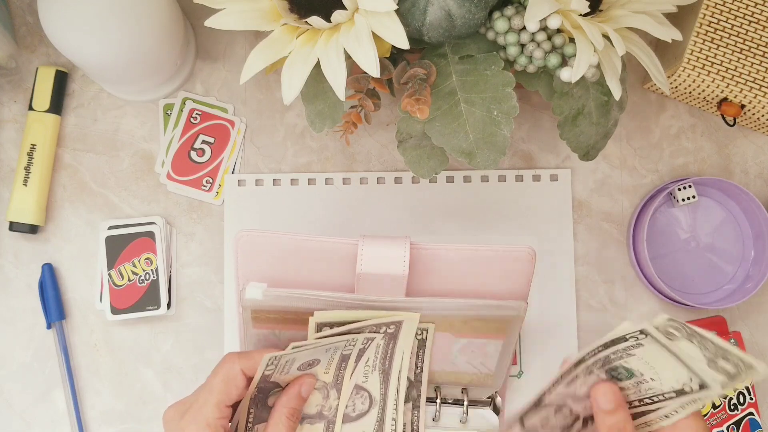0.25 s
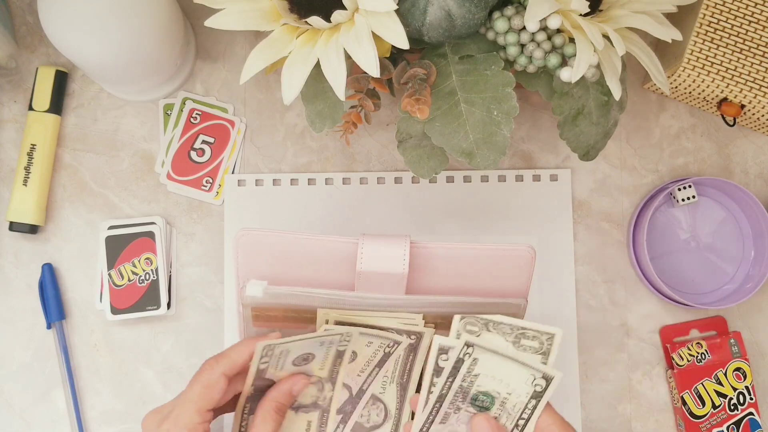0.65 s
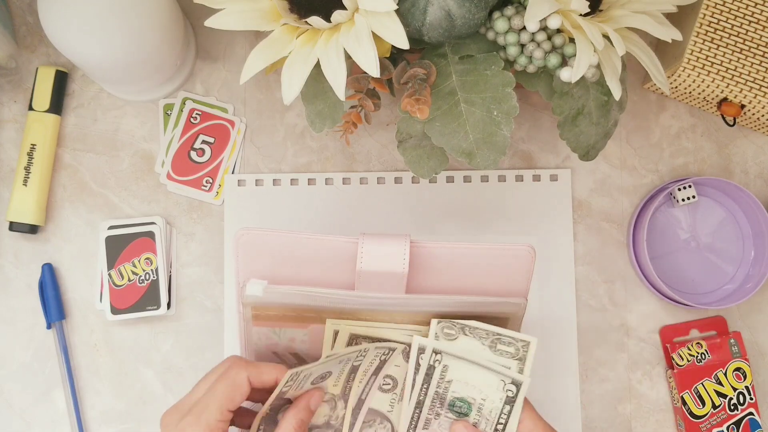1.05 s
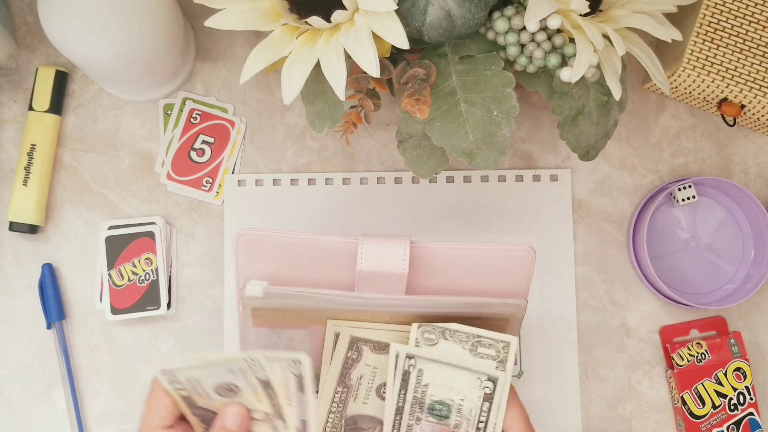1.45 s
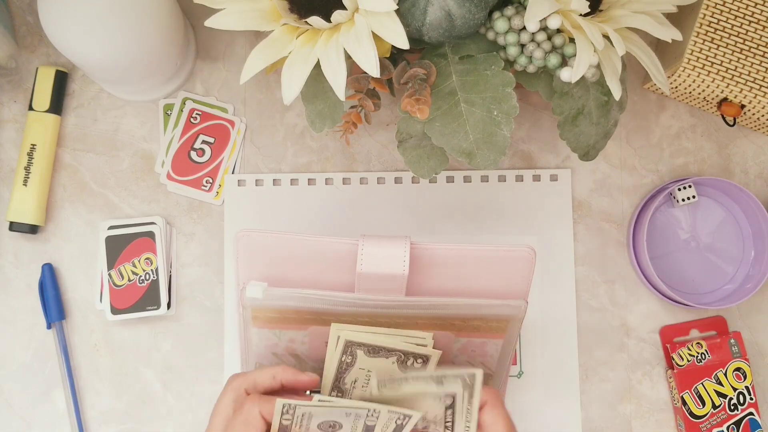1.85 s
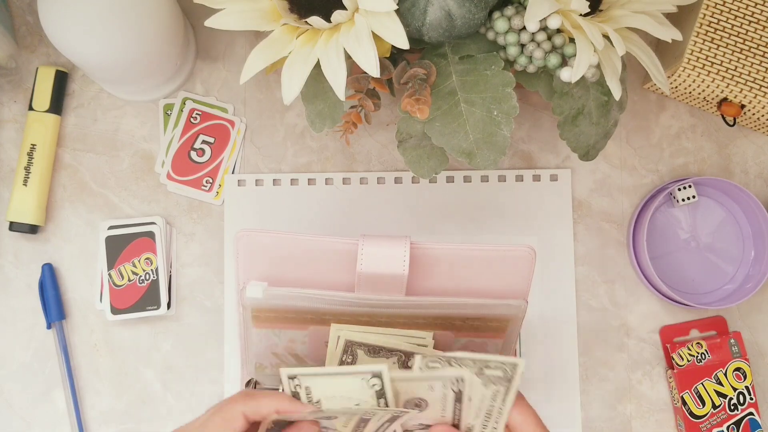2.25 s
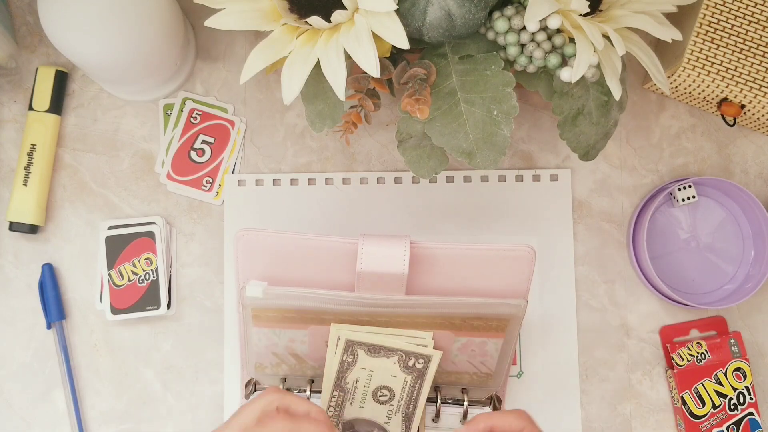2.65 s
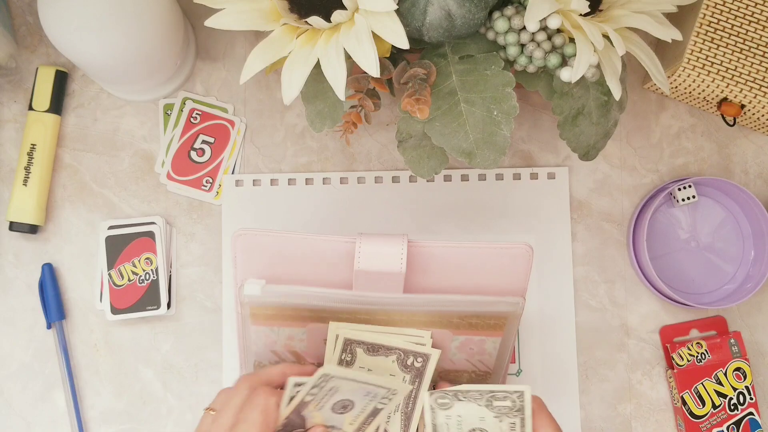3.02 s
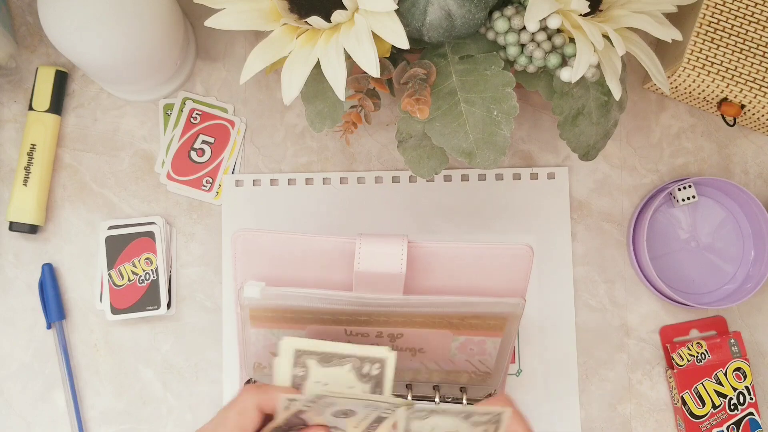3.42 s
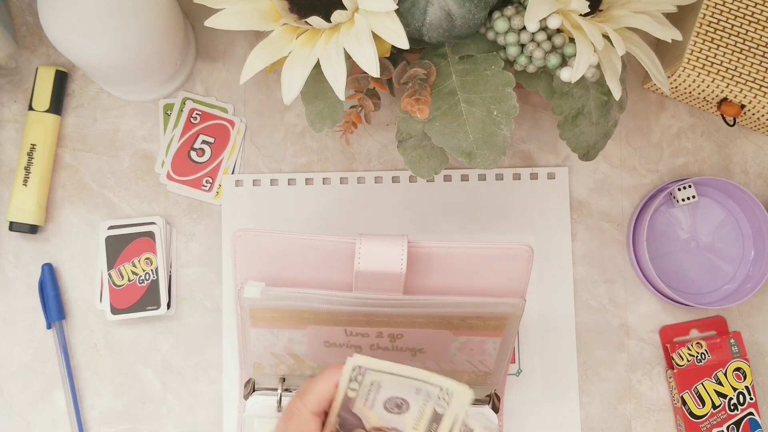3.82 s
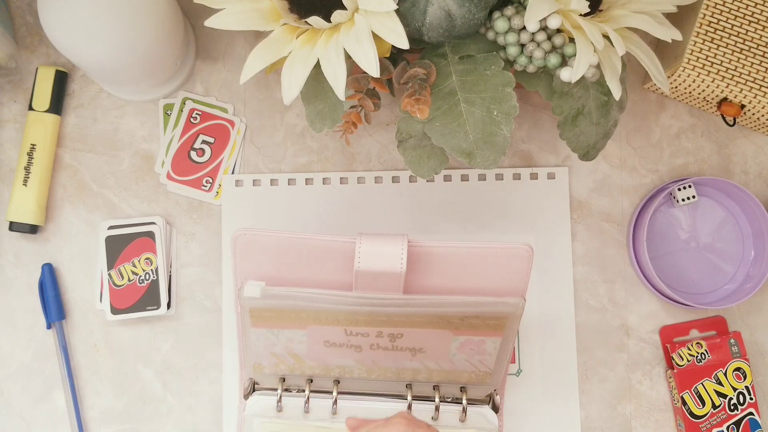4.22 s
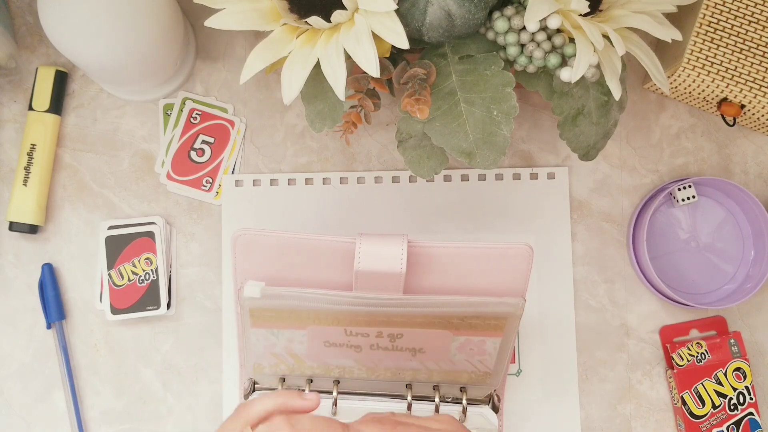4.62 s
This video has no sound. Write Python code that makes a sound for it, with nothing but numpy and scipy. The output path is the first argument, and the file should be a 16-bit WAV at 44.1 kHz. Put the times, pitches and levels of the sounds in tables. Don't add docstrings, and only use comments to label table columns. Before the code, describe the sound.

Close to the microphone, hands sort worn paper bills at a table in a small quiet room. A quick rustle opens, then soft thin sliding; after two seconds the handling grows busy with flexing, crisp snaps and flicks, peaking in a sharp snap near the end before fading. A steady low motor hum slowly pulses underneath.

```python
import sys
import numpy as np
from scipy import signal
from scipy.fft import rfft, irfft, next_fast_len
from scipy.io import wavfile
from scipy.ndimage import uniform_filter1d

SR = 44100
rng = np.random.default_rng(int(sys.argv[2]) if len(sys.argv) > 2 else 0)


def boost(x):
    u = np.asarray(x, float) / 20
    return 10 ** u


def materialize(psi):
    bounded = np.clip(np.atleast_2d(psi).T, -1, 1)
    quanta = np.round(bounded * 32767).astype(np.int16)
    wavfile.write(sys.argv[1], SR, quanta)


N = 210435


def rms_one(x):
    return x / np.sqrt(np.mean(x ** 2) + 1e-20)


def at_hz(points, hz):
    points = np.array(points)
    return np.interp(np.log(hz + 1), np.log(points[:, 0]), points[:, 1], left=-130, right=-130)


def coloured(x, spectrum):
    size = next_fast_len(len(x))
    gain = boost(at_hz(spectrum, np.fft.rfftfreq(size, 1 / SR)))
    return irfft(rfft(x, size) * gain, size)[:len(x)]


def drift(rate_hz):
    r = np.exp(-2 * np.pi * rate_hz / SR)
    slow = rng.standard_normal(N + SR)
    for _ in range(2):
        slow = signal.lfilter([1 - r], [1, -r], slow)
    return rms_one(slow[SR:])


def resonance(x, hz, width_hz):
    r = np.exp(-np.pi * width_hz / SR)
    poles = [1, -2 * r * np.cos(2 * np.pi * hz / SR), r * r]
    return signal.lfilter([(1 - r * r) / 2, 0, (r * r - 1) / 2], poles, x)


def blurred(field, bins, frames):
    return uniform_filter1d(uniform_filter1d(field, size=bins, axis=0), size=frames, axis=1)


def hum():
    # frequency in Hz, peak level in dB.
    tones = [(63.01, -36.3), (59.58, -45.5), (120.045, -50.2), (119.1, -67), (240.09, -71)]
    # frequency in Hz, density in dB per Hz.
    rumble_colour = [(15, -13), (30, -11), (41, -16), (52, 8.5), (75, 1.5), (100, -5), (150, -12.5),
                     (210, -18.5), (320, -21.5), (420, -38.5), (1000, -46.5), (2500, -55), (6000, -42.5),
                     (14000, -48)]
    beat_top_s, rumble_db = 0.237, -47
    t = np.arange(N) / SR - beat_top_s
    out = boost(rumble_db) * rms_one(coloured(rng.standard_normal(N), rumble_colour))
    for hz, db in tones:
        level = boost(db + 0.2 * drift(4.5))
        out += level * np.cos(2 * np.pi * hz * t + 0.04 * drift(0.27))
    return out


def room(x):
    t60_s, gap_s = 0.15, 0.003
    t = np.arange(SR // 2) / SR
    tail = rng.standard_normal(len(t)) * boost(-60 * t / t60_s) * (t > gap_s)
    tail = signal.lfilter([0.5], [1, -0.5], tail)
    return signal.fftconvolve(x, tail / np.sqrt(np.sum(tail ** 2)))[:N]


def thumps():
    # start in seconds, peak level in dB, 60 dB decay in seconds.
    blows = [(0.088, -40, 0.09), (1.582, -47, 0.17), (2.591, -53, 0.15), (2.646, -51.5, 0.085),
             (3.682, -50, 0.17), (3.797, -45, 0.28), (3.866, -48, 0.07), (3.974, -45, 0.23),
             (4.018, -41.5, 0.088), (4.379, -41, 0.088), (4.593, -48, 0.041), (4.614, -47, 0.16)]
    out, t = np.zeros(N + SR), np.arange(SR // 4) / SR
    board = signal.butter(2, [130, 480], "band", fs=SR, output="sos")
    onset = 1 - np.exp(-t / 0.0012)
    for s, peak_db, t60_s in blows:
        noise = rng.standard_normal(len(t))
        puff = signal.sosfilt(board, noise * boost(-60 * t / max(t60_s, 0.01)) * onset)
        at = round(s * SR)
        out[at:at + len(t)] += boost(peak_db) * puff / np.abs(puff).max()
    return out[:N]


def ticks():
    # start in seconds, peak level in dB.
    flicks = [
        (0.39, -46),
        (1.599, -33),
        (1.811, -54),
        (2.705, -42),
        (2.964, -31),
        (3.219, -50),
        (3.473, -43),
        (3.8, -41.5),
        (4.357, -38.5),
        (4.362, -31),
    ]
    decay_s, low_cut_hz = 0.0019, 5000
    out, t = np.zeros(N + SR), np.arange(SR // 40) / SR
    bright = signal.butter(2, low_cut_hz, "high", fs=SR, output="sos")
    for s, peak_db in flicks:
        burst = signal.sosfilt(bright, rng.standard_normal(len(t)) * np.exp(-t / decay_s))
        at = round(s * SR)
        out[at:at + len(t)] += boost(peak_db) * burst / np.abs(burst).max()
    return out[:N]


def snaps():
    # start in seconds, peak level in dB, ringing in Hz, low flexing part in dB.
    creases = [(0.091, -37, 4740, -35), (0.131, -38, 5840, -30), (0.39, -38, 4540, -34),
               (0.434, -37.5, 5640, 7), (1.599, -35, 3800, -30), (1.62, -42, 3980, -3),
               (2.163, -39, 3350, -11), (2.195, -30.5, 3500, -16), (2.367, -28.5, 3200, 12),
               (2.584, -37.5, 5160, -27), (2.644, -28.5, 5440, -12), (2.705, -26.5, 7700, -45),
               (2.716, -32.5, 7200, -23), (2.964, -36.5, 5000, -31), (3.003, -41, 3370, 4),
               (3.019, -38.5, 3880, 20), (3.176, -46, 3880, -8), (3.219, -37, 3180, -5.5),
               (3.407, -45, 5360, -3), (3.473, -35, 4900, -18), (3.8, -33, 3440, -6),
               (3.816, -30.5, 3440, -4), (3.879, -28.5, 3120, -5), (3.97, -32, 3960, -27),
               (3.987, -32, 3160, -25), (4.015, -31.5, 3400, 6), (4.127, -36, 3800, -41),
               (4.137, -31, 2960, -45), (4.361, -31, 4570, -7), (4.3865, -17.5, 3320, -3)]
    rattle_db, rattle_s = -18.5, 0.022
    out, t = np.zeros(N + SR), np.arange(SR // 6) / SR
    bright = signal.butter(2, [2800, 14000], "band", fs=SR, output="sos")
    dull = signal.butter(2, [550, 2200], "band", fs=SR, output="sos")
    pop = (1 - np.exp(-t / 0.0002)) * np.exp(-t / 0.001)
    envelope = pop + boost(rattle_db) * np.exp(-t / rattle_s)
    for s, peak_db, hz, flex_db in creases:
        white = rng.choice([-1, 1], len(t)) * rng.uniform(0.79, 1, len(t))
        burst = white * envelope
        high = signal.sosfilt(bright, burst) + boost(8) * resonance(burst, hz, 0.16 * hz)
        high = signal.lfilter(*signal.butter(2, min(1.75 * hz, 15000), fs=SR), high)
        low = signal.sosfilt(dull, burst) + boost(3) * resonance(burst, 1450, 400)
        both = high / np.abs(high).max() + boost(flex_db) * low / np.abs(low).max()
        at = round(s * SR)
        out[at:at + len(t)] += boost(peak_db + 3) * both / np.abs(both).max()
    return out[:N]


def fibres(per_s, spread_db, clump_db):
    sizes = boost(spread_db * np.minimum(rng.exponential(1, N), 5)) * rng.choice([-1, 1], N)
    chance = rng.random(N) < per_s / SR
    return sizes * chance * boost(clump_db * drift(34))


def bending(x, patchy_db):
    cells = signal.stft(x, nperseg=512)[2]
    patches = blurred(blurred(rng.standard_normal(cells.shape), 4, 8), 4, 8)
    return signal.istft(cells * boost(patchy_db * rms_one(patches)), nperseg=512)[1][:N]


def sheet(x):
    # frequency in Hz, width in Hz, lift in dB.
    modes = [(719, 32, 7.5), (1235, 20, 5.5), (1447, 22, 9), (1603, 14, 9), (1906, 110, 5),
             (3485, 760, 6.5), (5600, 60, 7), (10100, 90, -1)]
    return x + sum((boost(db) - 1) * resonance(x, hz, width_hz) for hz, width_hz, db in modes)


def swell(s, db, rise_s, fade_s):
    rounding = 1.223
    t = np.arange(N * 1000 // SR + 2) / 1000 - s
    away = np.maximum(-t / np.maximum(rise_s, 0.002), t / np.maximum(fade_s, 0.01))
    return db - 20 * away ** rounding


def strokes(rows, rise_s, rise_share, body_db):
    fade_stretch = (0.99, 1, 1, 1.02)
    body_per_weight = 1.58
    s, rub_db, fade_s, weight_db, sheen_db = np.transpose(rows)[:, :, None]
    parts_db = [0, weight_db, sheen_db, body_db + body_per_weight * weight_db]
    powers = []
    for part_db, stretch in zip(parts_db, fade_stretch):
        level_db = swell(s, rub_db + part_db, rise_s + rise_share * fade_s, stretch * fade_s)
        powers.append(np.sum(boost(2 * level_db), axis=0))
    return np.array(powers)


def handling():
    # peak time in seconds,
    # rub in dB, seconds to fade 20 dB, weight in dB, sheen in dB.
    glides = [(0.052, -51, 0.07, -1.5, 4), (0.098, -41.5, 0.0353, -2, -2.5), (0.15, -53, 0.14, -4.5, 2),
              (0.28, -57, 0.23, -10.5, -2.5), (0.545, -53.5, 0.08, -8.5, -7), (0.624, -50, 0.213, -12, 2),
              (0.85, -53, 0.11, -9.5, 1.5), (1.0, -55.5, 0.08, -9.5, -3), (1.055, -59.5, 0.02, -24, 4.5),
              (1.23, -58, 0.2, -9, 1), (1.4, -74.5, 0.1, -2, -2), (1.54, -66, 0.4, -10.5, 0.5),
              (1.877, -57, -0.02, -4, 3), (1.98, -53.5, -0.37, -2.5, 6.5), (2.071, -58, 0.23, -11, -6),
              (2.147, -48, 0.04, -8, -3.5), (2.585, -46.5, 0.23, -4.5, -3.5), (2.865, -60, .08, -18, -5),
              (3.081, -50, 0.04, -3, -8.5), (3.545, -58.5, 0.14, -6, 4), (3.735, -57.5, 0.08, -17, 2.5),
              (4.136, -40.5, 0.0355, -11, -9.5), (4.585, -58, 0.08, -13, -1), (4.77, -60, 0.14, -10, -1)]
    # start in seconds,
    # rub in dB, seconds to fade 20 dB, weight in dB, sheen in dB.
    jolts = [(0.388, -57.5, .3, -1.5, -1), (1.598, -58.5, 0.1, 6.5, 3.5), (1.735, -67.5, 0.9, -2, 1),
             (1.811, -58, 1.4, -6, -0.5), (2.197, -47, -0.01, -1.5, -4), (2.365, -46, 0.12, 0, -3),
             (2.648, -44, 0.18, -6, -8), (2.706, -46.5, 0.1152, -10, -2), (2.963, -59, 0.6, 0.5, -1),
             (3.218, -47.5, 0.0359, 1.5, -2), (3.472, -54, 0.09, -7, 3), (3.874, -50, 0.0947, 3, 1.5),
             (0.94, -62.5, 0.21, -1.5, 2), (4.357, -47, 0.1253, -4.5, 0), (4.389, -37, -0.0057, 3.5, -14)]
    # peak time in seconds,
    # rub in dB, seconds to fade 20 dB, weight in dB, sheen in dB.
    shoves = [(1.115, -61.5, -0.44, -17, 2), (2.232, -51, .12, -1, -0.5), (2.345, -49, 0.1, -7.5, -3),
              (2.435, -52.5, 0.02, -4, 4), (2.53, -52.5, 0.21, -2.5, 0.5), (2.0, -59.5, 1.2, 0, 4.5),
              (3.145, -55.5, 0.31, -4, -2), (3.283, -55, 0.25, -5, -3), (3.33, -56, 0.2, -7.5, -1),
              (3.41, -56.5, 0.15, -7, 0), (3.625, -61, 0, -19, 2), (3.805, -44, 0.1747, -3, -2.5),
              (3.972, -45.5, .15, -3, -0.5), (4.014, -49.5, 0.0538, 5, -2), (4.17, -53.5, 0.14, -8, -1),
              (4.235, -64, 0.1, -8.5, 0), (4.381, -41.5, 0.0343, -4, 0), (4.48, -60.5, 0.26, -9, -1.5),
              (4.53, -60, 0, -11, -3), (4.66, -67, 0, -4, -4)]
    # peak time in seconds,
    # body in dB, seconds to fade 20 dB.
    flops = [(0.11, -60, 0.42), (0.27, -82, 0.6), (0.49, -70.5, 0.6), (0.72, -76, 0.34), (0.8, -71, .12),
             (0.98, -70.5, 0.37), (1.12, -84, 0.3), (1.34, -77.5, 1), (1.615, -58.5, 0.12),
             (1.82, -66, 0.3), (2.07, -74, -0.34), (2.16, -63, 0), (2.25, -67, 0), (2.44, -55, 0.15),
             (2.6, -52.5, 0.27), (2.988, -52.5, 0.09), (3.29, -63.5, 0.4), (3.41, -70, 0.6),
             (3.7, -74, 0.9), (3.813, -41, 0.0453), (3.98, -58.5, 0.12), (4.02, -62.5, 0.32),
             (4.384, -45, 0.0465), (4.6, -72, 0.3)]
    # rub, flex, hiss and body, all in dB.
    resting_db = (-90, -86, -79, -118)
    power = strokes(glides, rise_s=0, rise_share=0.85, body_db=-23)
    power += strokes(jolts, rise_s=0.003, rise_share=0, body_db=-10.5)
    power += strokes(shoves, rise_s=0.022, rise_share=0, body_db=-10.5)
    power += boost(2 * np.array(resting_db))[:, None]
    s, db, fade_s = np.transpose(flops)[:, :, None]
    power[3] += np.sum(boost(2 * swell(s, db, 0.38 * fade_s, fade_s)), axis=0)
    ms = np.arange(N) * 1000 / SR
    return [np.interp(ms, np.arange(len(p)), 10 * np.log10(p)) for p in power]


def slide():
    # frequency in Hz, density in dB per Hz.
    rub_colour = [(2200, -65), (2600, -9), (3400, -9.5), (4500, -5.5), (6000, -6.5), (7200, -20.5),
                  (8500, -39)]
    hiss_colour = [(6000, -12), (7200, -10), (8200, -10), (9500, -8), (11000, -9), (14000, -12.5),
                   (15200, -20)]
    flex_colour = [(850, -16.5), (1100, -26.5), (1260, -4), (1450, -4.5), (1900, -7), (2250, -7),
                   (2600, -11.5)]
    body_colour = [(330, -68), (450, -2.5), (560, 2), (740, 3), (900, 0), (1100, 7.5), (1350, -20.5)]
    rub_db, flex_db, hiss_db, body_db = handling()
    grains = fibres(per_s=7000, spread_db=0.0, clump_db=0.5)
    catch = sheet(bending(grains, patchy_db=2.5))
    rub = boost(rub_db + 0.18 * drift(56)) * rms_one(coloured(catch, rub_colour))
    hiss = boost(hiss_db + 0.67 * drift(16)) * rms_one(coloured(catch, hiss_colour))
    flex = boost(flex_db + 0.72 * drift(27)) * rms_one(coloured(catch, flex_colour))
    body = boost(body_db + 0.57 * drift(6.7)) * rms_one(coloured(catch, body_colour))
    return rub + hiss + flex + body


def scene():
    room_db = -11.5
    hits = snaps()
    paper = slide() + hits + ticks()
    return (hum() + boost(room_db) * room(hits) + thumps() + paper)[None, :]


def thin_bands(x):
    # frequency in Hz, level in dB per cell.
    thinning_floor = [(300, -125), (450, -106), (900, -105), (2450, -106), (3500, -108), (14000, -118)]
    # frequency in Hz, dB relative to the treble at which a band is dropped.
    masking = [(380, -15), (470, -15), (950, -7.5), (1450, -7), (2050, -20), (2480, -5.5), (2800, -4)]
    hz, _, cells = signal.stft(x, SR, nperseg=1024)
    power = blurred(np.abs(cells) ** 2, 5, 4)
    treble = power[hz > 3000].mean(axis=0)
    threshold = boost(2 * at_hz(thinning_floor, hz))[:, None] + treble * boost(2 * at_hz(masking, hz))[:, None]
    gain = np.clip(1 - threshold / (power + 1e-20), 0.02, 1)
    return signal.istft(cells * gain, SR, nperseg=1024)[1][:N]


def low_pass(x):
    return signal.sosfilt(signal.butter(12, 15530, fs=SR, output="sos"), x)


def record(dry):
    top_cut = signal.ellip(10, 0.3, 48, 14560, fs=SR, output="sos")
    mix = signal.sosfilt(top_cut, thin_bands(dry[0]))[None, :]
    return low_pass(mix)


dry = scene()
out = record(dry)
materialize(out)
```